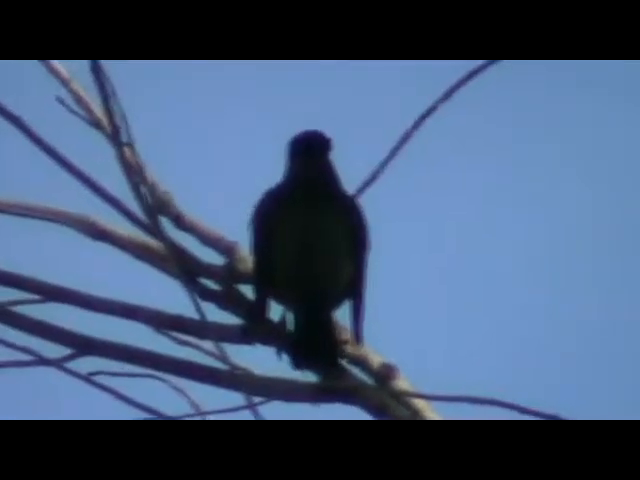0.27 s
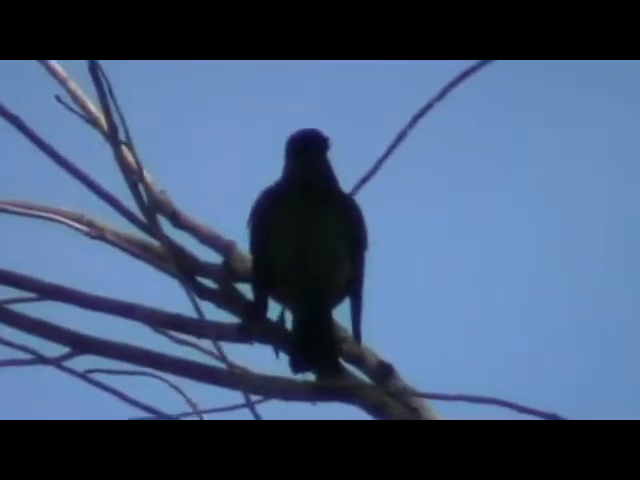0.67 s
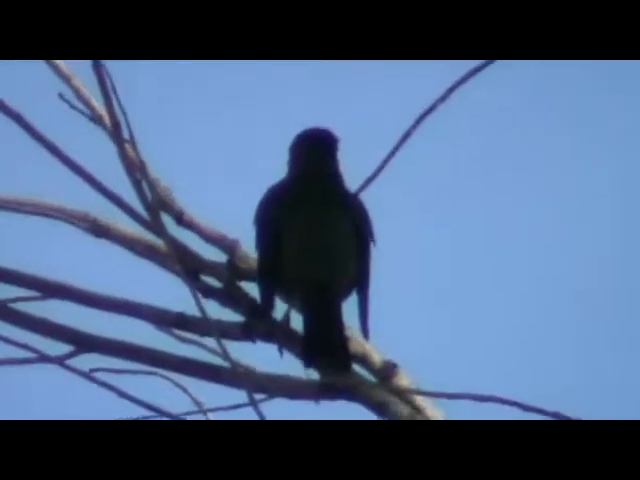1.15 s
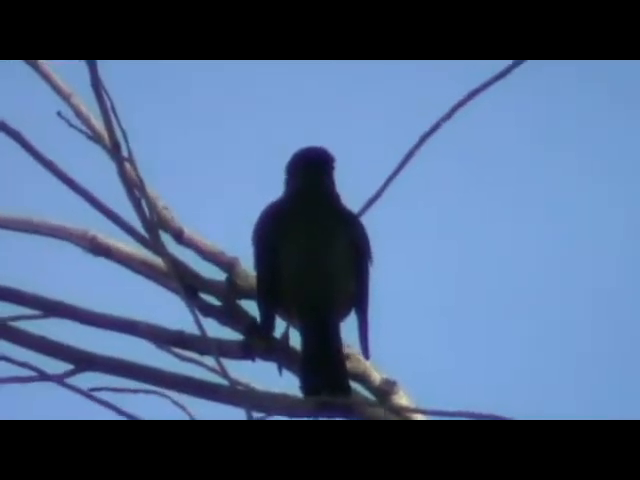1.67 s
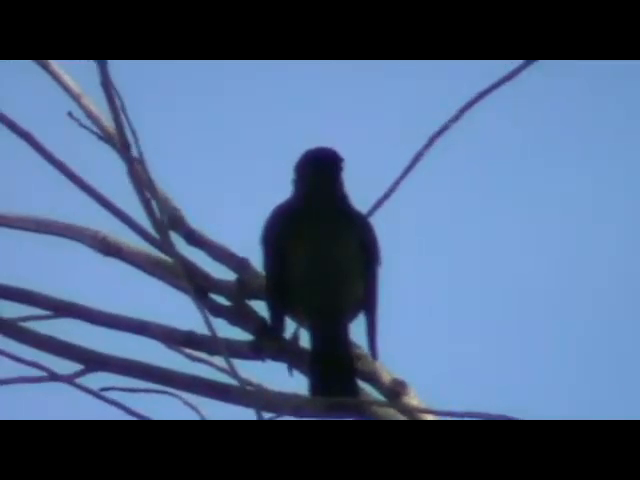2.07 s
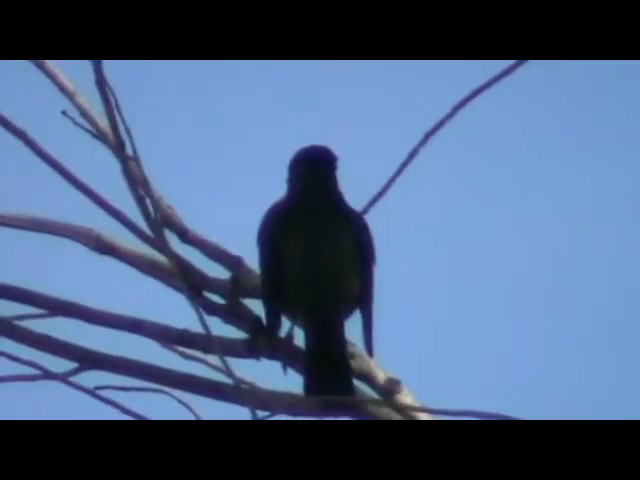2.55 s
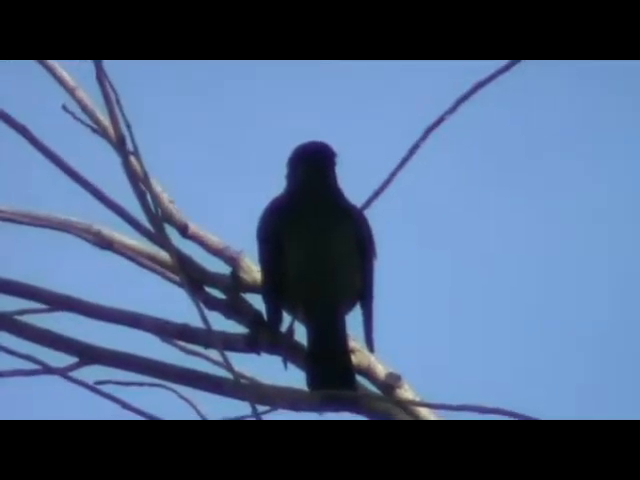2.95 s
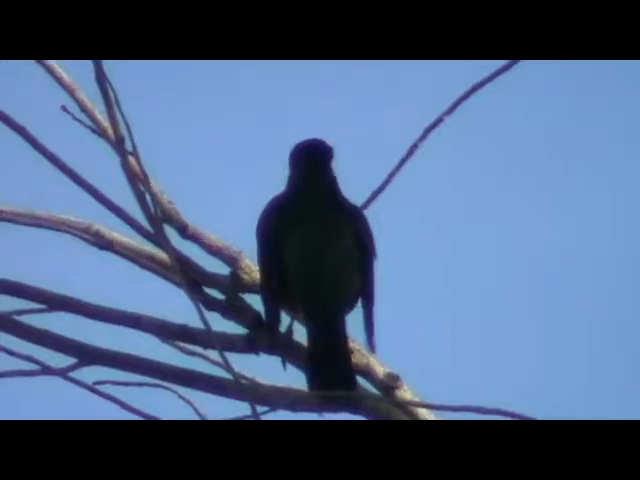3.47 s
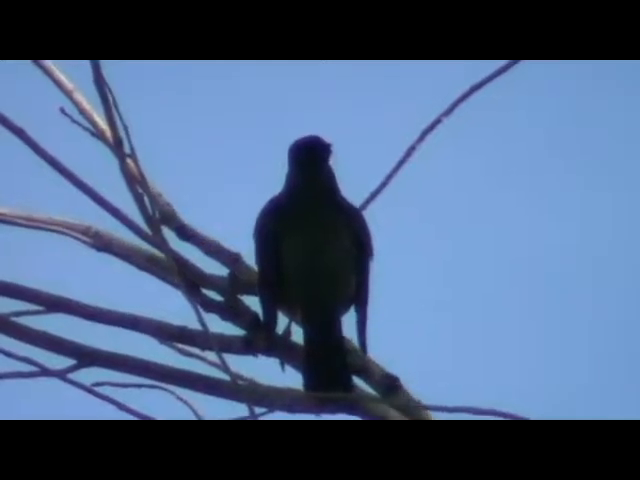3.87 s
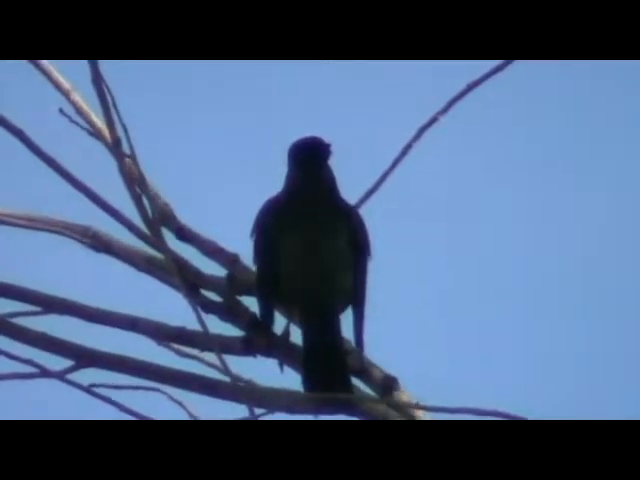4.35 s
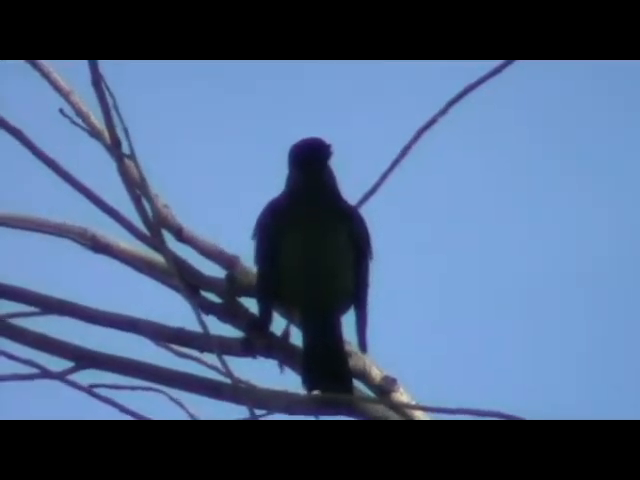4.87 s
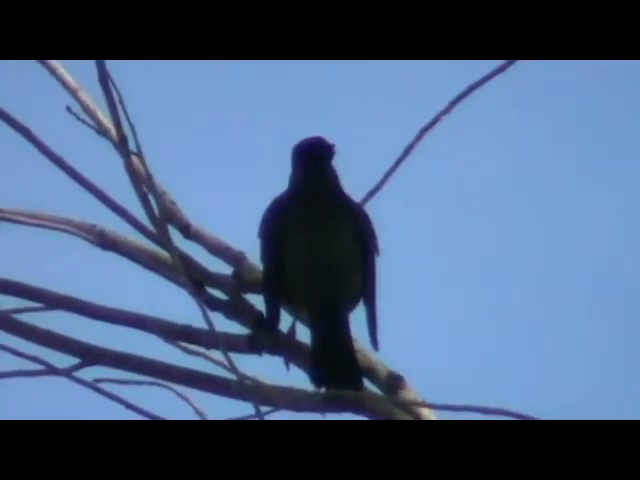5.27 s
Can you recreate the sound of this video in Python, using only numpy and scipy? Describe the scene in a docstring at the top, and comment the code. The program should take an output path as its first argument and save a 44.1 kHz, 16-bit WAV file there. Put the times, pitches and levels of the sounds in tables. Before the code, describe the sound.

Outdoors, a thrush on a bare branch sings soft, slurred whistles over the steady rush and drone of distant traffic. Wind rumbles on the microphone at first, and all sound cuts out briefly near the start. More whistles follow as the wind fades, then one dry tick. After a pause the song resumes with a short trill and a fast twitter. Faint hiss and a thin whine lie underneath.

```python
"""Distant traffic rushes and drones throughout, under a camera's own hiss and thin whine.
At first wind rumbles on the microphone and a thrush on a bare branch sings soft slurred whistles,
at times with both sides of its syrinx. At 0.5 s all sound cuts out for a third of a second.
More whistles follow as the wind dies down, then one dry tick at 2 s. From 3.4 s the song picks up
again, with a short trill at 4.7 s and a fast zigzag twitter just after 5.1 s."""
import sys
import numpy as np
from scipy import signal
from scipy.fft import rfft, irfft, next_fast_len
from scipy.io import wavfile
from scipy.ndimage import uniform_filter1d, map_coordinates

SR = 44100
rng = np.random.default_rng(int(sys.argv[2]) if len(sys.argv) > 2 else 0)


def put_to_file(sound):
    """Save the sound as 16-bit audio at rate SR, in the file named by the first command-line argument."""
    columns = np.atleast_2d(sound).T  # one column per channel
    safe = np.clip(columns, -1, 1)
    whole_steps = np.round(safe * 32767)
    wavfile.write(sys.argv[1], SR, whole_steps.astype(np.int16))


N = 242550  # 5.5 s


def amp(db):
    """Decibels to gain."""
    return 10 ** (np.asarray(db) / 20)


def unit_rms(x):
    """Scale to rms 1."""
    return x / np.sqrt(np.mean(x ** 2) + 1e-20)


def clock():
    """Sample times in s."""
    return np.arange(N) / SR


def log_interp(points, hz):
    """Interpolate (f/Hz, value) points on a log frequency axis."""
    knots_hz, values = np.transpose(points)
    return np.interp(np.log(hz + 1), np.log(knots_hz + 1), values)


def curve(rows):
    """Column 2 against the times in column 1, per sample."""
    times_s, values = np.transpose(rows)[:2]
    return np.interp(clock(), times_s, values)


def wobble(rate_hz, size=N):
    """Smooth random curve, rate_hz knots a second."""
    knots = rng.standard_normal(N // 20)
    return map_coordinates(knots, [np.arange(size) / SR * rate_hz], mode="wrap")


def swell(peak_s, rise_s, fall_s):
    """Gaussian rise to 1 and fall; widths are sigmas."""
    t = clock() - peak_s
    return np.exp(-.5 * (t / np.where(t < 0, rise_s, fall_s)) ** 2)


def gate(t, length_s, attack_s, release_s):
    """Linear attack, hold, linear release."""
    return np.clip(t / attack_s, 0, 1) * np.clip((length_s - t) / release_s, 0, 1)


def tone(hz):
    """Sine of rms 1 along a pitch curve."""
    return np.sqrt(2) * np.sin(2 * np.pi * (np.cumsum(hz) / SR + rng.random()))


def filtered(x, response):
    """Apply a frequency response, given as a function of Hz."""
    size = next_fast_len(N + SR // 2)
    hz = np.fft.rfftfreq(size, 1 / SR)
    return irfft(rfft(x, size) * response(hz), size)[..., :N]


def mix_in(out, start_s, sound):
    """Add a sound in place."""
    part = out[max(round(start_s * SR), 0):][:len(sound)]
    part += sound[:len(part)]


# Left-right likeness: f/Hz, correlation (clipped to 1)
COHERENCE = [(60, 2.45), (130, 1.3), (290, 0.62), (640, 0.64), (1410, 0.36), (3100, 0), (6820, 0.34),
             (15000, 0.81)]
# Lean to the road's side: f/Hz, left minus right/dB
BALANCE = [(60, -0.5), (110, 1), (200, 3), (380, -0.5), (700, 4.5), (1290, 4.5), (2380, 6.0), (4400, 1.5),
           (8120, 0.5), (15000, 0.5)]

def stereo_noise(spectrum, patchy_db):
    """Shaped noise of rms 1, its gain patchy in time and frequency, leaning left."""
    def mid_side_gains(hz):
        angle = np.arccos(np.clip(log_interp(COHERENCE, hz), -1, 1)) / 2
        return amp(log_interp(spectrum, hz)) * [np.cos(angle), np.sin(angle)]

    bins = signal.stft(rng.standard_normal((2, N)), nperseg=512)[2]
    patches = uniform_filter1d(rng.standard_normal(bins.shape[1:]), size=6, axis=0)
    patches = unit_rms(uniform_filter1d(patches, size=16, axis=1))
    pair = signal.istft(bins * amp(patchy_db * patches), nperseg=512)[1][:, :N]
    mid, side = filtered(pair, mid_side_gains)
    stereo = np.array([mid + side, mid - side])
    return unit_rms(filtered(stereo, lambda hz: amp(np.outer([.5, -.5], log_interp(BALANCE, hz)))))


# Preamplifier noise: f/Hz, relative density/dB
HISS_SPECTRUM = [(2000, -16), (5000, 3), (7500, 0.5), (10000, 0), (12000, -2.5), (15500, -7)]
# Electronic whine: f/Hz, level/dB, jitter/Hz
WHINE_TONES = [(11725, -70.5, 18), (15625, -57.5, 11)]

def camera(hiss_db=-52, flutter=.1):
    """Preamplifier hiss and the thin, jittery whine of the electronics."""
    whine = sum(amp(db) * (1 + flutter * wobble(120)) * tone(hz + jitter_hz * wobble(160))
                for hz, db, jitter_hz in WHINE_TONES)
    return amp(hiss_db) * stereo_noise(HISS_SPECTRUM, patchy_db=1.6) + whine


# Far engines: peak t/s, rise/s, fall/s, f at peak/Hz, glide/(Hz/s), level/dB
ENGINE_SWELLS = [(1.6, .5, 0.28, 137, 0.5, -40.5), (2.05, 0.66, .55, 108.5, 0, -37),
                 (2.3, 0.25, 0.16, 102, -39.5, -41.5), (3.5, 0.28, 0.091, 142.5, 4, -40),
                 (3.6, 0.83, 0.26, 67, -0.5, -41), (3.7, 0.099, .15, 90, -20, -41),
                 (4.2, 0.52, 0.55, 134.5, 1, -36), (4.85, 0.95, 0.57, 146.5, 4.5, -38),
                 (5.4, 1, .5, 69.8, 2.5, -37), (5.3, 0.41, .6, 83.3, 2.5, -35.5)]

def engines(unsteady_db=1.0, drift_hz=0.84, spread=0.089):
    """Exhaust notes swell, glide and beat together; stray paths differ at each ear."""
    out = np.zeros((2, N))
    for peak_s, rise_s, fall_s, peak_hz, glide_hz_per_s, db in ENGINE_SWELLS:
        hz = peak_hz + glide_hz_per_s * (clock() - peak_s)
        exhaust = tone(hz + drift_hz * wobble(7))
        stray = spread * np.array([[1], [-1]]) * wobble(6) * tone(hz)
        out += amp(db + unsteady_db * wobble(9.8)) * swell(peak_s, rise_s, fall_s) * (exhaust + stray)
    return out


# Tyre rush: t/s, level/dB
TYRE_LEVELS = [(0, -38.5), (1.0, -37.8), (2.0, -36), (2.3, -37), (4.6, -37.5), (5.5, -36.6)]
# Tyre rush: f/Hz, relative density/dB
TYRE_SPECTRUM = [(120, -29), (200, -4.5), (222, -3), (254, -9), (322, -4.5), (408, -6.5), (440, -3),
                 (474, -4.5), (859, -1), (1110, -5.5), (1430, -5.5), (2430, -13), (3640, -20.5),
                 (7000, -32.5), (9100, -64.5), (15400, -120)]
# Road rumble: f/Hz, relative density/dB
RUMBLE_SPECTRUM = [(15, -15), (35, -11), (65, 3.5), (110, -2), (150, -3.5), (220, -17), (300, -12.5),
                   (600, -46.5)]

def traffic(tyre_gain_db=2.5, rumble_db=-40, engine_gain_db=-1):
    """Tyre rush, rumble and engine drone from a distant road."""
    tyres = amp(curve(TYRE_LEVELS) + tyre_gain_db) * stereo_noise(TYRE_SPECTRUM, patchy_db=0.5)
    rumble = amp(rumble_db + 1.5 * wobble(6.4)) * stereo_noise(RUMBLE_SPECTRUM, patchy_db=1.64)
    return tyres + rumble + amp(engine_gain_db) * engines()


# Buffeting: f/Hz, relative density/dB
WIND_SPECTRUM = [(15, -8), (45, -1), (75, -5.5), (105, 2), (150, -6), (205, -6.5), (260, -20.5), (350, -14),
                 (900, -52.5)]
# Gusts: peak t/s, sigma/s, level/dB
WIND_GUSTS = [(0.033, 0.051, -22.5), (0.21, 0.047, -24), (0.37, 0.056, -23), (0.48, .02, -28.5),
              (1.107, 0.047, -31)]

def wind(breeze_db=-33.5, breeze_db_per_s=-4, spread=0.53, lumps_db=0.5):
    """Light gusts on a dying breeze buffet the microphone, partly each port on its own."""
    shared = stereo_noise(WIND_SPECTRUM, patchy_db=-2.5)
    side = stereo_noise(WIND_SPECTRUM, patchy_db=-4.5)[0]
    buffeting = unit_rms(shared + spread * np.array([side, -side]))
    gusts = sum(amp(db) * swell(peak_s, sigma_s, sigma_s) for peak_s, sigma_s, db in WIND_GUSTS)
    breeze = amp(breeze_db + breeze_db_per_s * clock())
    return np.hypot(gusts, breeze) * amp(lumps_db * wobble(23)) * buffeting


# Scatter from branches and farther trees: delay/s, t60/s, level/dB
TREE_ECHOES = [(.002, .09, -9), (0.018, 0.65, -12.5), (0.22, .16, -18)]

def tree_echoes(x, wet_db=0, bright_db=5):
    """Twigs and trees scatter diffuse echoes, most near 4.5 kHz, different at each ear."""
    t = np.arange(SR) / SR
    impulse = np.zeros((2, SR))
    for delay_s, t60_s, db in TREE_ECHOES:
        burst = rng.standard_normal((2, SR)) * (t > delay_s) * amp(-60 * np.abs(t - delay_s) / t60_s)
        impulse += amp(db) * burst / np.linalg.norm(burst[0])
    wet = signal.fftconvolve(x[None], impulse, axes=1)[:, :N]
    colour = [(3000, 0), (4500, bright_db), (9000, 0)]
    return filtered(wet, lambda hz: amp(wet_db + log_interp(colour, hz)))


# Snap: t/s, level/dB
TICK_ONSETS = [(2.0171, -21)]
# Its ring: f/Hz, relative level/dB, t60/s
RING_MODES = [(1900, -2, 0.0055), (3000, -2, 0.0072), (4500, 0, 0.0045), (4870, -4, 0.0051),
              (6360, -3, 0.0043), (7700, -4, .005)]

def tick(attack_s=0.00031, crack_db=-6, crack_t60_s=0.012):
    """One dry snap: a noise crack and a very short ring, echoed by the trees."""
    out = np.zeros(N)
    for start_s, db in TICK_ONSETS:
        t = np.maximum(clock() - start_s, 0)
        ring = sum(amp(mode_db - 60 * t / t60_s) * np.sin(2 * np.pi * (hz * t + rng.random()))
                   for hz, mode_db, t60_s in RING_MODES)
        crack = amp(crack_db - 60 * t / crack_t60_s) * rng.standard_normal(N)
        out += amp(db) * (1 - np.exp(-t / attack_s)) * (ring + crack)
    return out + tree_echoes(out, wet_db=-0.5)


# Faint high lisps: t/s, f/Hz, level/dB
SONG_LISPS = [(.452, 5280, -53), (1.166, 5130, -54), (4.365, 5820, -55), (4.39, 5600, -56),
              (4.475, 4970, -57), (4.535, 5240, -54), (5.2, 4000, -44), (5.233, 4900, -42)]

def lisps(sigma_s=0.0099, rasp=0.031):
    """Thin little notes, roughened by fast pitch jitter."""
    envelope = sum(amp(db) * swell(peak_s, sigma_s, sigma_s) for peak_s, _, db in SONG_LISPS)
    return envelope * tone(curve(SONG_LISPS) * (1 + rasp * wobble(980)))


# Soft chips between notes: t/s, f/Hz, level/dB
SONG_CHIPS = [(.128, 2990, -41), (.216, 3700, -44), (.296, 2870, -42), (.413, 3010, -47),
              (4.39, 3050, -47.5), (4.875, 3150, -45), (4.943, 4790, -49), (4.956, 3000, -43),
              (5.033, 3600, -46), (5.085, 3050, -50), (5.116, 2940, -39.5), (5.271, 4400, -43.5),
              (5.265, 2900, -41), (5.284, 3550, -45), (5.347, 3280, -43.5), (5.427, 2740, -46)]

def chips(sigma_s=0.0038, fall_nepers_per_s=18, rasp=.085):
    """A few milliseconds each of raspy, steeply falling tone."""
    out = np.zeros(N)
    jitter = 1 + rasp * wobble(1200)
    for peak_s, hz, db in SONG_CHIPS:
        t = np.clip(clock() - peak_s, -.03, .03)
        envelope = amp(db) * np.exp(-.5 * (t / sigma_s) ** 2)
        out += envelope * tone(hz * np.exp(-fall_nepers_per_s * t) * jitter)
    return out


def syrinx(hz, envelope, waver=0.006, flutter_db=1.7, octave_db=-40):
    """A nearly pure whistle, slightly unsteady in pitch and level."""
    hz = hz * (1 + waver * wobble(300, size=len(hz)))
    flutter = amp(flutter_db * wobble(260, size=len(hz)))
    return envelope * flutter * (tone(hz) + amp(octave_db) * tone(2 * hz))


# Pips of the trill: t/s, f/Hz, level/dB
TRILL_PIPS = [(4.699, 2830, -38), (4.723, 2750, -34), (4.745, 2693, -31.5), (4.766, 2680, -36),
              (4.787, 2590, -41)]

def trill(sigma_s=0.0043):
    """The airflow is chopped into pips on a sinking pitch."""
    pips = sum(amp(db) * swell(peak_s, sigma_s, sigma_s) for peak_s, _, db in TRILL_PIPS)
    return syrinx(curve(TRILL_PIPS), pips)


# Zigzags: top t/s, rise/s, fall/s, first f/Hz, top f/Hz, last f/Hz, rise level/dB, fall level/dB
TWITTER_ZIGZAGS = [(5.139, 0.0095, .03, 5460, 6670, 4120, -40, -36.5),
                   (5.177, 0.0081, 0.024, 4000, 6670, 2690, -39, -33),
                   (5.210, .006, 0.019, 3200, 6450, 2930, -30, -35),
                   (5.243, .006, .022, 3480, 6100, 2660, -31, -35)]

def twitter(throat_hz=4550, half_width_hz=630, slide_power=1.3, edge_s=0.0012):
    """The pitch flicks up, then slides ever faster down through the throat's resonance."""
    out = np.zeros(N)
    for top_s, rise_s, fall_s, first_hz, top_hz, last_hz, rise_db, fall_db in TWITTER_ZIGZAGS:
        length_s = rise_s + fall_s
        t = np.arange(int(length_s * SR)) / SR
        flick_hz = first_hz + (top_hz - first_hz) * t / rise_s
        slide_hz = top_hz + (last_hz - top_hz) * np.clip((t - rise_s) / fall_s, 0, 1) ** slide_power
        hz = np.where(t < rise_s, flick_hz, slide_hz)
        throat = 1 / np.hypot(1, (hz - throat_hz) / half_width_hz)
        db = np.interp(t, [rise_s - edge_s, rise_s + edge_s], [rise_db, fall_db])
        envelope = amp(db) * throat * gate(t, length_s, edge_s, edge_s)
        mix_in(out, top_s - rise_s, syrinx(hz, envelope))
    return out


# Slurred notes: start t/s, length/s, first f/Hz, middle f/Hz, last f/Hz, level/dB, crescendo/dB
SONG_NOTES = [(0.0, 0.033, 2806, 2765, 2660, -32.5, -8), (0.041, 0.033, 2980, 2840, 2830, -36, 8),
              (0.353, .026, 5800, 4250, 3790, -39.5, -6), (0.463, .033, 4550, 4990, 5530, -52, -2.5),
              (0.48, 0.024, 3040, 3170, 3420, -38, -2), (0.87, .042, 3100, 3400, 3430, -43, -3.5),
              (0.886, 0.027, 2500, 2720, 3050, -31.5, 8), (.913, 0.046, 3050, 3210, 3030, -28.5, 0),
              (0.968, 0.039, 2876, 3235, 2910, -28.5, 4), (1.006, 0.037, 2960, 2796, 2650, -27.5, 2),
              (1.015, 0.038, 3330, 3550, 3480, -48, 0), (1.378, 0.041, 2890, 3160, 2500, -33, 4),
              (1.425, 0.035, 2810, 2974, 2560, -37, 16), (1.499, 0.048, 3130, 3520, 2930, -37, 19),
              (1.552, .034, 3530, 3740, 3030, -38, 0), (2.9, 0.026, 5000, 5800, 6500, -51, 0),
              (3.428, .09, 3010, 3130, 2990, -36, 8), (3.521, .026, 2970, 2680, 3000, -35, 0.5),
              (3.544, 0.04, 2955, 2880, 2840, -37.5, -3), (4.041, .033, 3890, 3730, 3800, -45.5, 2),
              (4.086, .042, 3190, 3450, 3730, -37, -5), (4.132, 0.014, 3150, 3450, 3820, -35, -3.5),
              (4.143, 0.026, 3150, 3184, 3200, -37, -9.5), (4.417, .088, 3600, 3990, 4020, -51.5, -1),
              (4.518, 0.048, 2260, 2590, 2550, -41, 2), (4.567, 0.037, 2500, 2490, 2680, -37.5, -5),
              (4.596, 0.054, 2660, 2900, 2890, -35.5, -2), (4.647, .034, 2854, 2790, 2680, -35, 1),
              (4.667, .029, 4030, 3990, 3820, -46, -3), (4.698, 0.052, 3770, 3640, 3560, -41.5, 1),
              (4.763, .032, 3420, 3390, 3250, -42.5, 0), (5.105, 0.031, 5800, 5660, 5450, -51, 5),
              (5.279, .069, 4620, 4910, 4940, -47, -8), (5.28, .024, 5700, 5950, 6060, -50, 0),
              (5.383, .115, 4520, 3720, 3540, -58, 3)]

def whistles(attack_share=0.15, release_s=0.0053):
    """Each note is one parabola of pitch; where two overlap, both sides of the syrinx sound."""
    out = np.zeros(N)
    for start_s, length_s, first_hz, middle_hz, last_hz, db, crescendo_db in SONG_NOTES:
        t = np.arange(int(length_s * SR)) / SR
        progress = t / length_s
        bow_hz = middle_hz - (first_hz + last_hz) / 2
        hz = first_hz + (last_hz - first_hz) * progress + bow_hz * (1 - (2 * progress - 1) ** 2)
        level = amp(db + crescendo_db * (progress - .5))
        envelope = level * gate(t, length_s, attack_share * length_s, release_s)
        mix_in(out, start_s, syrinx(hz, envelope))
    return out


def thrush(whistle_gain_db=-1, twitter_gain_db=-2.5, pan_db=0.4, left_lead_s=8e-6):
    """The song arrives from almost straight ahead, then from the trees."""
    song = amp(whistle_gain_db) * whistles() + amp(twitter_gain_db) * twitter()
    song += trill() + chips() + lisps()
    sides = np.array([[.5], [-.5]])
    direct = filtered(song, lambda hz: amp(pan_db * sides) * np.exp(2j * np.pi * hz * left_lead_s * sides))
    return direct + tree_echoes(song)


def scene():
    """All sources, in stereo."""
    return thrush() + traffic() + wind() + tick() + camera()


def record(dry, mute_from_s=.498, mute_to_s=.848, top_hz=15850):
    """One dropout, then a brick-wall low-pass."""
    live = (clock() < mute_from_s) | (clock() > mute_to_s)
    return filtered(dry * live, lambda hz: hz < top_hz)


dry = scene()
out = record(dry)
put_to_file(out)
```